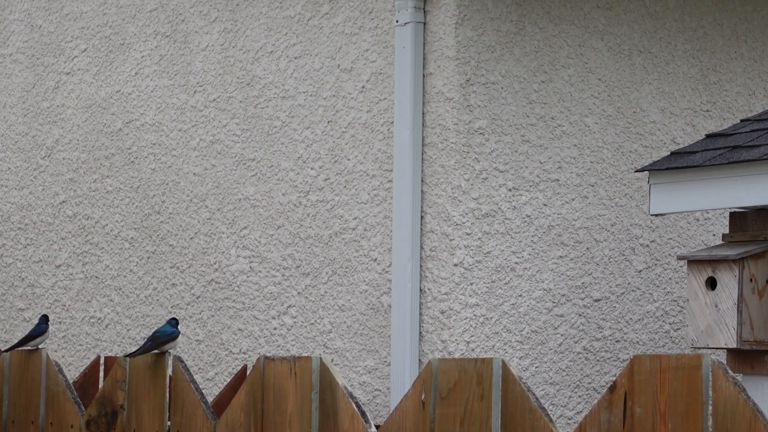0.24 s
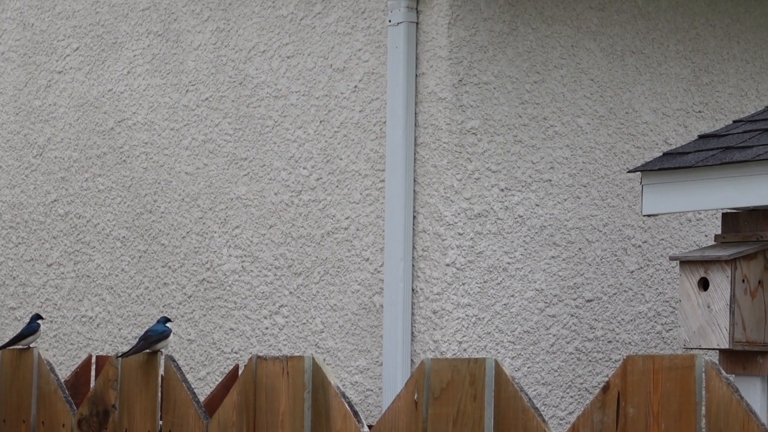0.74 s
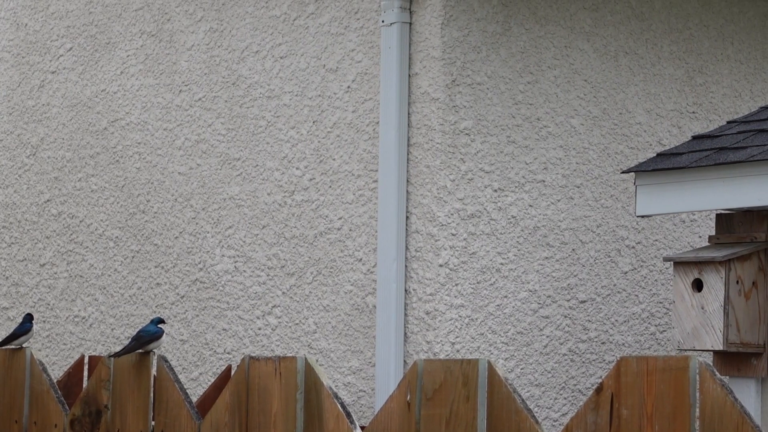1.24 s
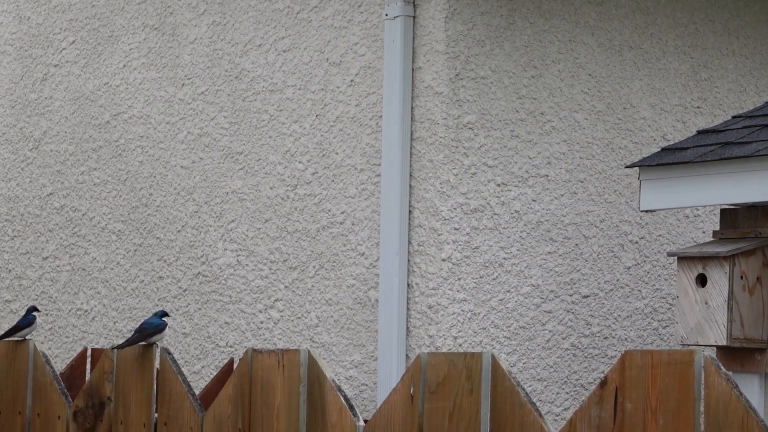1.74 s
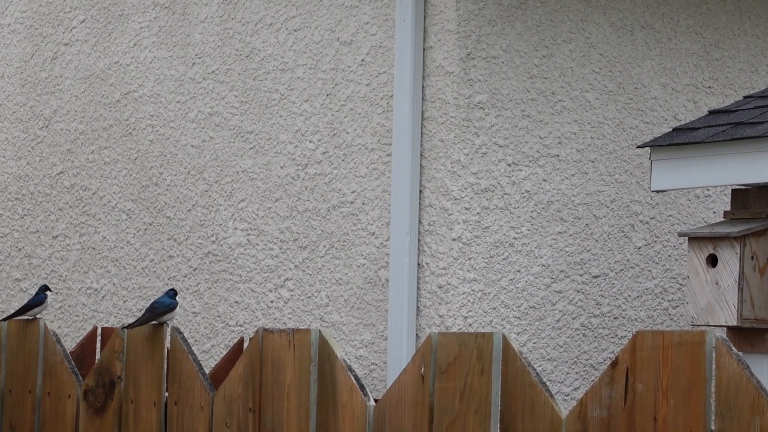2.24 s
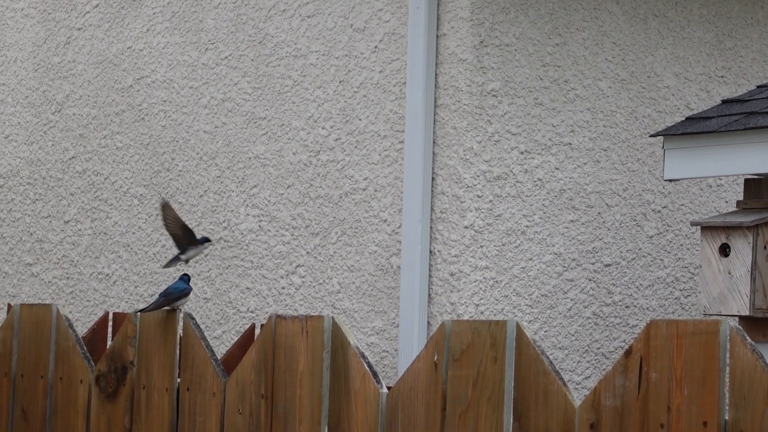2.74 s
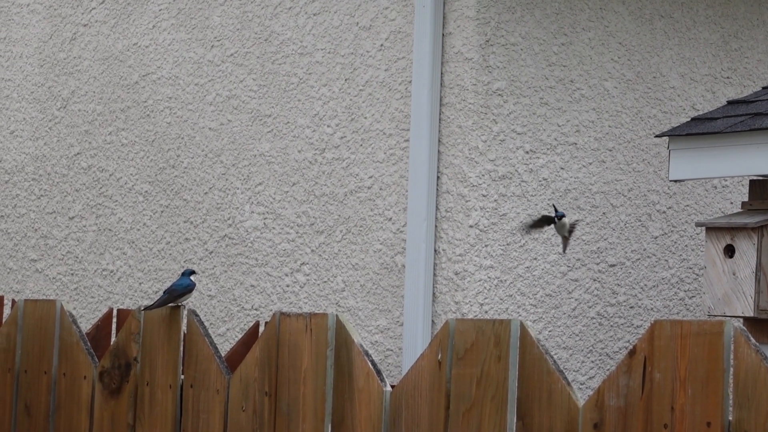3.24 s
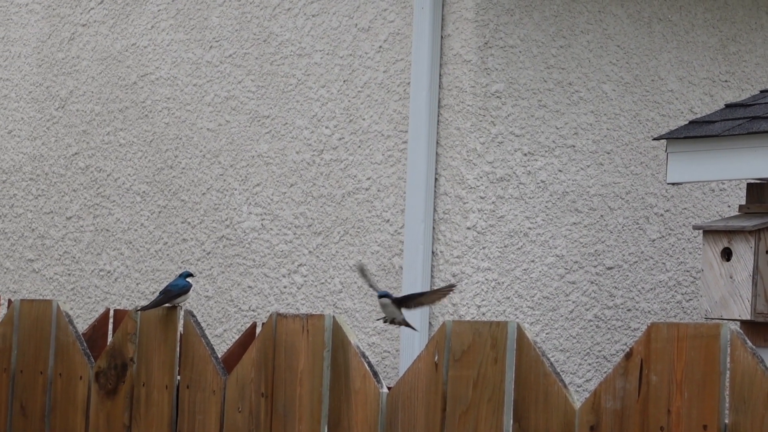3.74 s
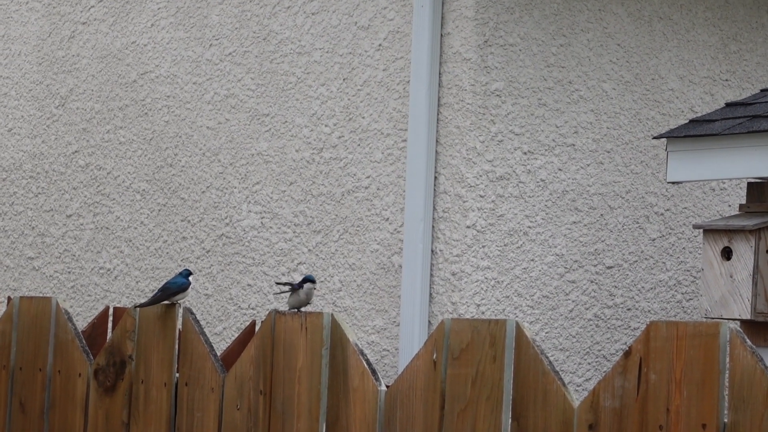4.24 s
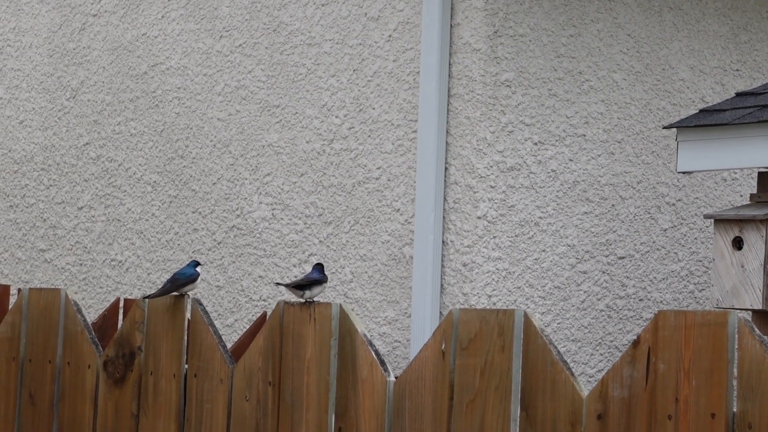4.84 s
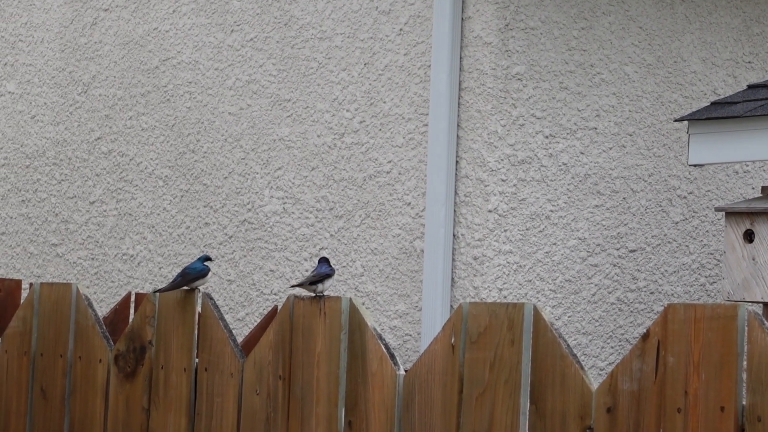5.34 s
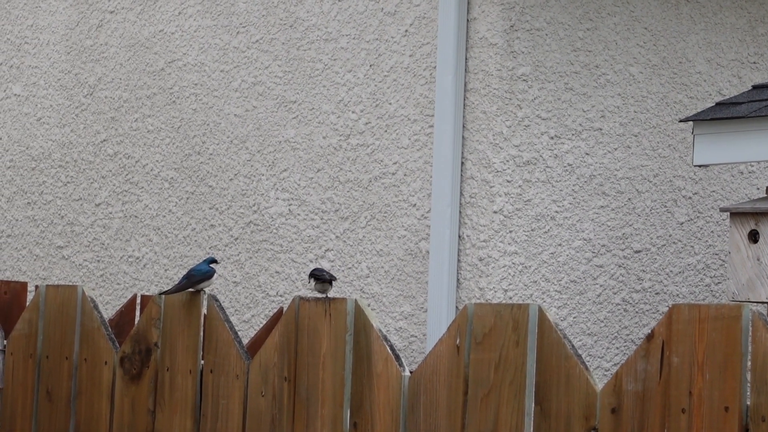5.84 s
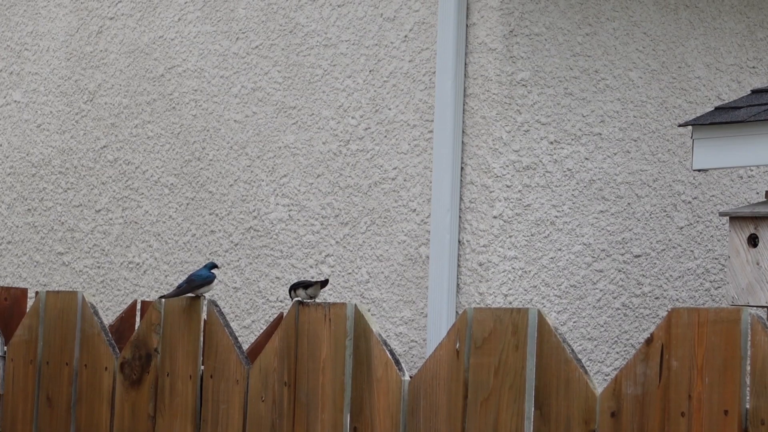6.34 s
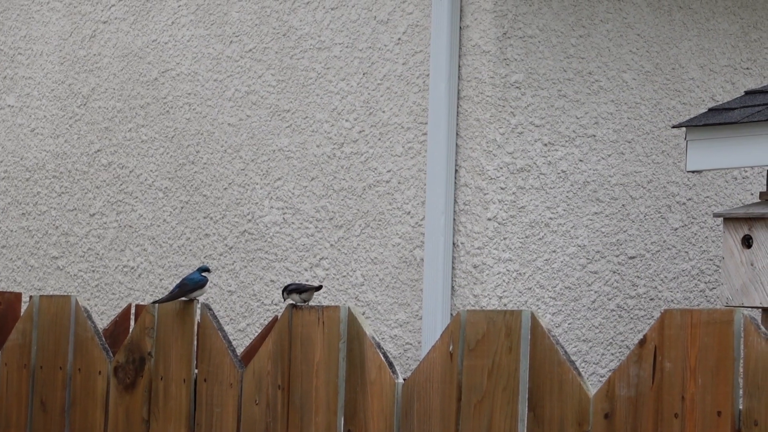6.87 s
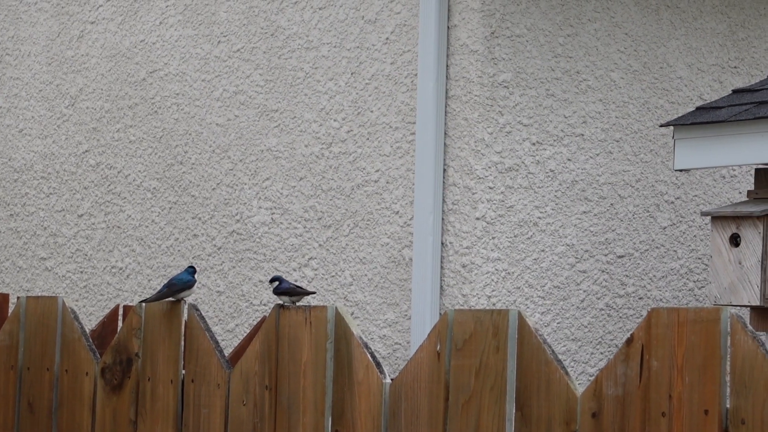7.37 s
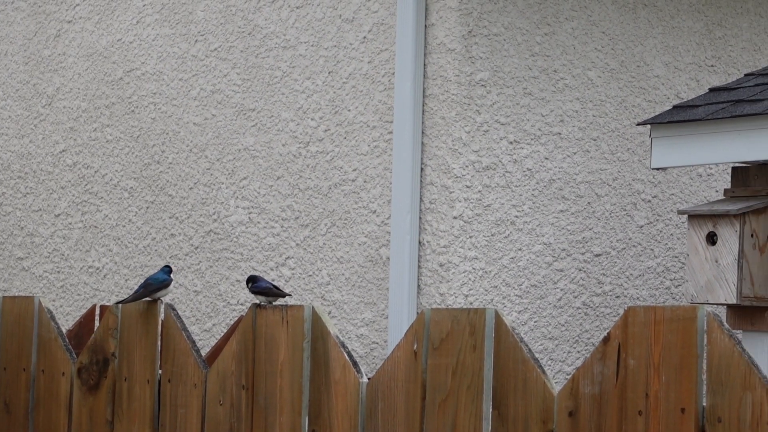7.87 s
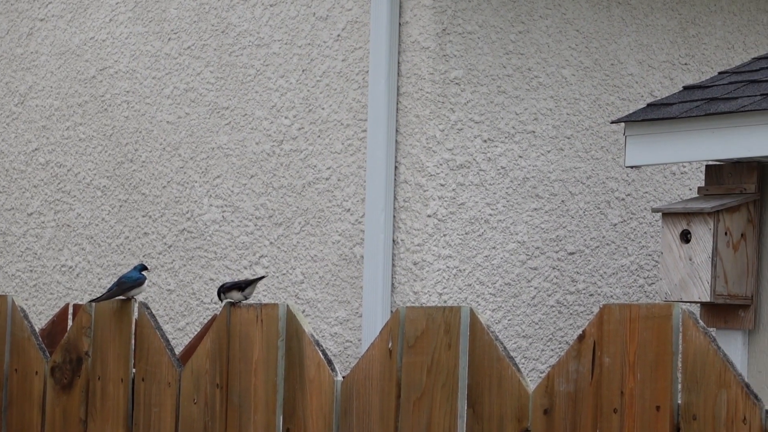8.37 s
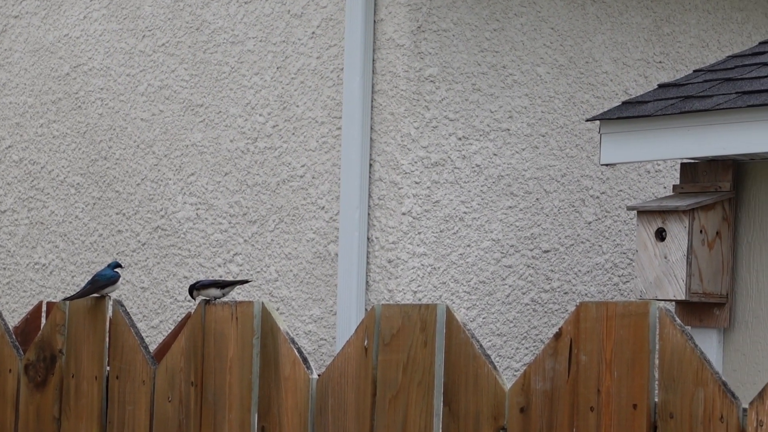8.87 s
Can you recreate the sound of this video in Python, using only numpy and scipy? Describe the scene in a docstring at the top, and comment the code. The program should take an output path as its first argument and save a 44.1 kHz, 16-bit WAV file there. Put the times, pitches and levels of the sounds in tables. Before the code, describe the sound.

Two small birds chatter outdoors, from sparse ticks to bright falling runs and a harsh rasp, before a distant trill and returning chips.

```python
"""Quiet town air, a wavering low hum and far whistles lie behind swallows calling on a yard fence by a wall.
Short chips come first, then warbles, harsh rasps, lone falling notes, runs of four and arched whistles.
Near the end a far bird trills and the chips return. Calls are gliding tones with overtones; rasps add
throbbing noise. The wall throws each call back at once and the yard's scattered echoes die away within
half a second."""
import sys
import numpy as np
from scipy import signal
from scipy.fft import rfft, irfft
from scipy.io import wavfile
from scipy.ndimage import uniform_filter1d

SR = 44100
rng = np.random.default_rng(int(sys.argv[2]) if len(sys.argv) > 2 else 0)


def wav_out(sig):
    """Save sig, one row per channel (or a flat mono array), as 16-bit PCM at SR to the path in sys.argv[1]."""
    wavfile.write(sys.argv[1], SR, np.round(np.clip(np.atleast_2d(sig).T, -1, 1) * 32767).astype(np.int16))


N = 401751  # samples


def amp(db):
    """Decibels to amplitude."""
    return 10 ** (np.asarray(db) / 20)


def evened(x):
    """Brings a signal to an rms of 1."""
    return x / np.sqrt(np.mean(x ** 2) + 1e-20)


def wobble(count, span):
    """Smooth chance of rms 1 that changes over about span samples."""
    smooth = uniform_filter1d(rng.standard_normal(count), span)
    return evened(uniform_filter1d(smooth, span))


def read(points, hz):
    """Reads a curve of (Hz, value) points along a logarithmic frequency axis."""
    point_hz, value = np.transpose(points)
    return np.interp(np.log(hz + 1), np.log(point_hz + 1), value)


def follow(points, t):
    """Reads a curve of (seconds, value) points at the times t."""
    return np.interp(t, *np.transpose(points))


def add(mix, s, sound):
    """Lays a sound into the mix at s seconds, cut off at the end of the mix."""
    part = mix[round(s * SR):][:len(sound)]
    part += sound[:len(part)]


def steps(length):
    """Runs from 0 to 1 over a length in seconds."""
    return np.linspace(0, 1, round(length * SR))


def swell(u, rise, fall):
    """Soft start and end over the given shares of a sound."""
    edge = np.minimum(u / rise, (1 - u) / fall)
    return np.sin(np.pi / 2 * np.clip(edge, 0, 1)) ** 2


def sing(hz, partials_db, unsteady=.5):
    """A tone on the pitch curve hz; its overtones flicker and take the colour of the beak."""
    # What the beak passes of overtones. Each row: frequency in Hz, gain in dB.
    beak = [(6500, 3), (8000, 0.5), (10000, -15.5), (12600, 8.5), (14200, -23)]
    turn = 2 * np.pi * (np.cumsum(hz) / SR + rng.random())
    hiss = np.diff(rng.standard_normal(len(hz) + 1))  # air hissing past the voice
    tone = amp(partials_db[0]) * np.sin(turn) + amp(-47) * hiss
    for partial, db in enumerate(partials_db[1:], start=2):
        flicker = 1 + unsteady * wobble(len(hz), 12)
        level = amp(db + read(beak, partial * hz))
        tone = tone + level * flicker * np.sin(partial * turn)
    return tone


def far_birds():
    """Faint wavering glides, low blips, and a trill of V-shaped notes."""
    # Far whistles. Each row: start in seconds, length in seconds, start pitch in Hz, end pitch in Hz, level in dB.
    far_whistles = [(0, 0.037, 2740, 2700, -50), (0.221, 0.046, 3070, 2930, -58),
                    (0.511, 0.54, 2674, 2822, -67), (0.68, 0.095, 4120, 3760, -64),
                    (1.56, 0.13, 3940, 3940, -62.5), (3.095, .022, 5250, 5750, -41),
                    (6.978, 0.06, 4270, 5560, -56), (7.084, 0.043, 6840, 4300, -60),
                    (7.11, 0.13, 3290, 3350, -61), (7.158, 0.07, 4390, 5500, -57),
                    (7.993, 0.045, 2800, 2320, -64), (8.03, 0.22, 2320, 2340, -66),
                    (8.25, .07, 2540, 2680, -67) , (8.138, 0.084, 2920, 2900, -67),
                    (8.521, 0.071, 3040, 3030, -63), (8.531, 0.052, 4560, 5100, -51.5)]
    # Faint low blips. Each row: start in seconds, length in seconds, pitch in Hz, level in dB.
    blips = [(1.285, .025, 390, -56), (7.808, .02, 570, -55)]
    # The growing level of the trill. Each row: time in seconds, level in dB.
    trill_level = [(7.8, -56.5), (8.3, -49), (9.1, -44)]
    out = np.zeros(N)
    for s, length, start_hz, end_hz, db in far_whistles:
        u = steps(length)
        hz = start_hz + (end_hz - start_hz) * u + 55 * wobble(len(u), 250)
        level = amp(db + 1.6 * wobble(len(u), 500))
        add(out, s, level * sing(hz, [0]) * swell(u, 0.15, 0.076))
    for s, length, hz, db in blips:
        u = steps(length)
        add(out, s, amp(db) * np.sin(2 * np.pi * hz * length * u) * swell(u, 0.15, 0.26))
    u = steps(.019)
    v_hz = np.interp(u, [0, .6, .75, 1], [5900, 3950, 4050, 6500])
    k = np.arange(30)
    trill_s, gap_s, hurry_s = 7.791, .0462, 3.7e-5
    # the trill speeds up a little: each gap is twice hurry_s shorter than the one before
    for s in trill_s + (gap_s - hurry_s * k) * k:
        add(out, s, amp(follow(trill_level, s)) * sing(v_hz, [0]) * swell(u, .3, .2))
    return out


def hum():
    """A low machine tone with a weak octave, a little unsteady in pitch and level."""
    # The slow drift of the hum's pitch. Each row: time in seconds, pitch in Hz.
    pitch = [(0, 142.1), (9.11, 138)]
    # The rise and fall of the hum. Each row: time in seconds, rms level in dB before the wavering.
    loudness = [(0, -66.5), (1.8, -52), (3.2, -46.5), (4.1, -57), (5, -59), (6.2, -54), (7.9, -51.5),
                (8.9, -60)]
    t = np.arange(N) / SR
    hz = follow(pitch, t) + 1.46 * wobble(N, 2500)
    turn = 2 * np.pi * np.cumsum(hz) / SR
    level = np.sqrt(2) * amp(follow(loudness, t) + 0.32 * wobble(N, 2500))
    return level * (np.sin(turn) + amp(-30.5) * np.sin(2 * turn))


def air():
    """Town air on two sides: random short-time spectra with faint drifting patches."""
    # The colour of the air. Each row: frequency in Hz, relative level in dB per Hz.
    colour = [(20, -46), (60, -30.5), (110, -4), (200, -9), (480, -20), (1350, -23), (2300, -26),
              (3500, -29.5), (15700, -44.5)]
    # How alike left and right are. Each row: frequency in Hz, likeness from 0 to 1.
    likeness = [(25, 0.69), (90, .95), (300, 0.71), (1500, 0.54), (8000, 0.67)]
    frames, hz = N // 512 + 5, np.fft.rfftfreq(2048, 1 / SR)
    a, b, c, d, patches = rng.standard_normal((frames, 1025, 5)).T
    patches = uniform_filter1d(patches, 20, 0)  # across frequency
    patches = evened(uniform_filter1d(patches, 12, 1))  # across time
    same = np.clip(read(likeness, hz), -1, 1)[:, None]
    left, other = a + 1j * b, c + 1j * d
    right = same * left + np.sqrt(1 - same ** 2) * other
    spectra = np.array([left, right]) * amp(read(colour, hz)[:, None] + 0.5 * patches)
    sound = signal.istft(spectra, nperseg=2048, noverlap=1536)[1][:, :N]
    return amp(-54.5) * evened(sound)


def chip(db, hz, third_db):
    """A few milliseconds of a low, rich tone with a strong second partial and a noisy snap."""
    u = steps(0.0035)
    partials_db = [-3, 3, third_db, third_db - 22, -28, -32]
    tone = sing(hz * (1 + 0.093 * (u - .5)), partials_db, unsteady=.22)
    snap = amp(third_db - 20) * rng.standard_normal(len(u))
    return amp(db - 5) * (tone + snap) * swell(u, 0.24, 0.077)


def warble(climb, db, opening_db, start_hz, hump_hz, dip_hz, dip, top_hz):
    """Fast vibrato over a hump that sags, a jump to the top, then a clean slide down."""
    # The opening. Each row: share of the climb's time, level in dB, vibrato depth as a share of pitch.
    opening = [(0, -5, 0.054), (.12, -6, 0.049), (.33, 0, 0.078), (.7, -2.5, .07)]
    slide_s, slide_bend, slide_end_hz = .023, .82, 3300
    t = np.arange(round((climb + slide_s) * SR)) / SR
    share, level_db, depth = np.transpose(opening)
    at = np.append(share * climb, climb)
    slide = np.clip((t - climb) / slide_s, 0, 1)
    # the hump comes early; the jump from the dip lands just under the top
    turning_points = [0, .15, dip, dip + .14, 1]
    hz = np.interp(t / climb, turning_points, [start_hz, hump_hz, dip_hz, .94 * top_hz, top_hz])
    hz = hz - (top_hz - slide_end_hz) * np.sin(np.pi / 2 * slide) ** slide_bend
    hz = uniform_filter1d(hz, size=150)
    vibrato_turns = 225 * t + 0.071 * wobble(len(t), 200) + rng.random()
    shake = np.interp(t, at, np.append(depth, .02)) * (1 - slide) ** 8
    shake = shake * np.sin(2 * np.pi * vibrato_turns)
    level = amp(db + np.interp(t, at, np.append(level_db + opening_db, 0)) - 14.5 * slide)
    throb = 1 + 6 * shake  # louder at the top of each shake
    return level * throb * sing(hz * (1 + shake), [0, -21, -42]) * swell(t / t[-1], .06, .05)


def rasp(rows):
    """Chaotic voicing: throbbing broad noise around a wavering tone that can clear up."""
    # The colour of the noise. Each row: frequency in Hz, relative level in dB per Hz.
    noise_colour = [(900, -27), (1500, -17.5), (3600, 0.5), (6000, 3), (9200, -21), (15000, -28.5)]
    s, level_db, hz, clear = np.transpose(rows)
    t = np.arange(s[0], s[-1], 1 / SR)
    clear = np.clip(np.interp(t, s, clear), 0, 1)
    noise = rng.standard_normal(len(t))
    colour = amp(read(noise_colour, np.fft.rfftfreq(len(t), 1 / SR)))
    broad = irfft(rfft(noise) * colour, len(t))
    wavering_hz = np.interp(t, s, hz) * (1 + 0.081 * (1 - clear) * wobble(len(t), 70))
    tone = sing(wavering_hz, [34 * clear ** 2 - 19, 2, -18, -22])
    throb = amp(1.22 * (2.0 - clear ** 2) * wobble(len(t), 90))
    voice = throb * ((1 - clear) * evened(broad) + clear * evened(tone))
    return amp(np.interp(t, s, level_db)) * voice * signal.windows.tukey(len(t), .1)


def note(db, start_hz, end_hz, length, hook_hz, bend):
    """Hooks up to its pitch and then drops ever faster, fading as it falls."""
    u = steps(length)
    hook = hook_hz * np.exp(-u / .16)
    hz = start_hz - hook + (end_hz - start_hz) * u ** bend
    return amp(db - 12 * u ** 2) * sing(hz, [0, -35, -41]) * swell(u, .18, .2)


def run_of_notes(db, lead_db, lead_hz, second_hz, lift_hz, spacing):
    """A high lead, a loud held note, then two steeper slides, each lower."""
    # The four notes. Each row: delay in spacings, level in dB, start pitch in Hz before the run's own
    # pitch or lift is added, end pitch in Hz, length in seconds.
    four_notes = [(0, 4, 30, 4200, .0085), (0.989, 4.5, 8.6, 3100, .0098), (2.051, 2.5, 5500, 2740, .0085),
                  (2.95, 2, 4560, 2513, .009)]
    # Their shapes. Each row: upward hook at the start in Hz, bend of the fall (1 is straight).
    shapes = [(700, 2.8), (400, 2.7), (250, 1.5), (200, 1.3)]
    out = np.zeros(SR // 10)
    own = [(lead_db, lead_hz), (0, second_hz), (0, lift_hz), (0, lift_hz)]
    for row, shape, (own_db, own_hz) in zip(four_notes, shapes, own):
        delay, step_db, hz, end_hz, length = row
        sound = note(db + step_db + own_db, hz + own_hz, end_hz, length, *shape)
        add(out, delay * spacing, sound)
    return out


def arch(length, top_hz, db):
    """A whistle that climbs quickly, holds, and dips at the end."""
    u = steps(length)
    climb = .54 * np.exp(-u * length / .0051)  # share of pitch, over a time in s
    dip = .37 * np.exp((u - 1) * length / .00234)
    hz = top_hz * (1 - climb - dip)
    return amp(db) * sing(hz, [0, -33, -29]) * swell(u, .35, .15)


def swallows():
    """All near calls, dry, each placed at its time."""
    # Each row: start in seconds, level in dB, pitch in Hz, third partial in dB before the beak's colour.
    chips = [(0.055, -33.5, 1892, 4), (0.2912, -36.5, 2630, -14), (1.0907, -38.5, 2340, -12),
             (1.2407, -36, 2140, -8), (1.363, -33.5, 2330, -9), (1.497, -35, 2087, -1.5),
             (2.266, -35.5, 1970, -7), (2.36, -35.5, 2230, -9), (2.4776, -35, 2100, -0.5),
             (2.985, -29, 2395, -8), (3.123, -33, 2550, -12), (3.5805, -27, 2730, -14),
             (8.342, -33.5, 1970, 4.5), (8.441, -32.5, 1980, 3.5), (8.5814, -35.5, 2680, -8),
             (8.717, -29, 2387, -5.5), (8.882, -27, 2330, -7), (9.0218, -32, 2350, -8.5)]
    # Each row: start in seconds, time to the pitch top in seconds, level in dB, opening level in dB added
    # to it, start pitch in Hz, early hump in Hz, dip in Hz, dip as share of the time, top in Hz.
    warbles = [(2.102, .073, -23.5, -4, 3200, 4700, 3900, .73, 5250),
               (2.780, .075, -17.5, -1, 3800, 4750, 3750, .7, 5200),
               (3.056, .076, -14.5, -7, 3100, 4600, 3950, .75, 5250),
               (3.543, .071, -16, -3, 3500, 4900, 3800, .7, 5200),
               (3.908, .07, -13.5, -5, 3400, 4700, 3800, .62, 5350),
               (5.083, .071, -16.5, -6, 4300, 5100, 4000, .6, 5150),
               (5.953, .068, -25, 1, 4500, 4500, 3800, .72, 4820),
               (7.433, .069, -17.5, -6, 4400, 4850, 4200, .64, 5200)]
    # One table a rasp. Each row: time in seconds, level in dB, voice pitch in Hz, clear share from 0 to 1.
    rasps = [
        [(2.62, -54, 2700, 0.95), (2.665, -37.5, 2585, 0.02), (2.695, -25.5, 2000, 0.32),
         (2.745, -44, 2067, 0.63)],
        [(3.224, -39.5, 2670, 0.3), (3.262, -26, 2837, 0.47), (3.31, -21.5, 2970, 0.57),
         (3.33, -25.5, 3010, 0.6)],
        [(3.345, -39.5, 2894, 0.06), (3.380, -18, 2800, 0.66), (3.388, -24, 3900, .85), (3.392, -28, 3350, .85),
         (3.395, -27.5, 4250, 0.95), (3.409, -29, 3150, 0.92) ],
        [(4.518, -37, 2056, 0.42), (4.53, -27.5, 1920, 0.39)],
    ]
    # Lone sliding notes. Each row: start in seconds, level in dB, start pitch in Hz, end pitch in Hz,
    # length in seconds.
    lone_notes = [(3.7476, -16.5, 5460, 3110, 0.0076), (3.755, -14.5, 5080, 2920, 0.0077),
                  (4.187, -40, 4760, 3790, 0.012), (4.675, -45, 4430, 3800, 0.0084),
                  (5.0702, -25, 4930, 3550, 0.013), (5.9875, -18, 5500, 3900, 0.011),
                  (6.578, -36, 4250, 3380, 0.0064), (6.777, -40, 2460, 1860, .009),
                  (7.208, -31, 4650, 3100, 0.008), (7.2144, -24, 5540, 2920, 0.02),
                  (7.231, -24, 4400, 3180, 0.0096), (7.241, -40, 2570, 3030, 0.016),
                  (7.256, -23.5, 4000, 2900, 0.0105), (7.265, -22.5, 5350, 3610, 0.022),
                  (7.283, -21, 4290, 2670, 0.012), (7.296, -27, 5610, 3670, 0.011)]
    # The shape of a lone note: upward hook at the start in Hz, bend of the fall (1 is straight).
    lone_shape = (49, 1.36)
    # Runs of four falling notes. Each row: start in seconds, level in dB, lead note's level in dB added to it,
    # lead pitch in Hz, second pitch in Hz, lift of the last two in Hz, spacing in seconds.
    runs = [(3.862, -21.5, -10, 6160, 5340, 102, 0.0096), (3.931, -22.5, -4, 6000, 5420, 506, 0.0074),
            (4.1973, -22.5, -10, 6120, 5380, 88, 0.01), (4.264, -19.5, -6.5, 6260, 5320, 400, 0.0082),
            (4.685, -26, -10, 6020, 5420, 200, 0.011), (4.751, -22, -6, 5970, 5260, 503, 0.0091),
            (4.824, -23, -10.5, 6184, 4950, 443, 0.0081), (5.090, -21, -8, 6010, 5280, 101, 0.01),
            (5.155, -20, -10, 6200, 5100, 529, 0.0084), (5.429, -22.5, -13, 6240, 5290, 0, 0.0088),
            (5.503, -22.5, -8, 6520, 5470, 698, 0.009), (5.585, -24, -15, 5340, 4800, 487, .0088),
            (6.065, -19.5, -4, 5570, 4970, -100, .0097), (6.135, -17.5, -2.5, 5560, 5090, 594, 0.0089),
            (6.286, -17.5, -6, 5590, 5270, -350, 0.0099), (6.360, -18, -8, 6380, 5190, 534, 0.0087),
            (6.586, -18.5, -6, 5740, 5300, -100, 0.0089), (6.659, -19.5, -7, 6480, 5350, 547, 0.0092),
            (6.741, -22.5, -8.5, 5726, 4980, 534, 0.0081)]
    # Arched whistles between the runs. Each row: start in seconds, length in seconds, top in Hz, level in dB.
    arches = [(3.899, 0.032, 4350, -26), (4.236, 0.029, 4495, -22.5), (4.726, 0.028, 4310, -27.5),
              (4.803, 0.025, 3996, -28.5), (5.463, 0.041, 4315, -25), (6.117, 0.019, 4360, -22.5),
              (6.274, 0.015, 4630, -30), (6.323, 0.04, 4280, -24), (6.633, 0.024, 4290, -24),
              (6.714, 0.027, 4050, -32.5)]
    out = np.zeros(N)
    for call, table in [(chip, chips), (warble, warbles), (run_of_notes, runs), (arch, arches)]:
        for s, *row in table:
            add(out, s, call(*row))
    for rows in rasps:
        add(out, rows[0][0], rasp(rows))
    for s, *row in lone_notes:
        add(out, s, note(*row, *lone_shape))
    return out


def yard(x):
    """Two wall echoes, and sparse taps of random sign that die away fast and then slowly."""
    at = np.arange(200, SR // 2, 20)
    t = at / SR
    fast = amp(-5 - 60 * t / .06)
    slow = amp(-30 - 60 * t / .5)
    fade = (fast + slow) * np.minimum(t / .023, 1)  # the scattered echoes take 23 ms to build up
    taps = np.zeros((2, SR // 2 + 20))
    signs = rng.choice([-1., 1.], (3, len(at)))
    place = at + rng.integers(0, 20, len(at))
    taps[:, place] = fade * (signs[0] + 0.42 * signs[1:])  # partly shared by both sides
    taps[:, round(.0082 * SR)] = amp([-8, -9])  # wall echoes, left and right
    taps[:, round(.0165 * SR)] = amp([-16, -15])
    rough_walls = signal.butter(1, 7500, fs=SR, output="sos")  # they swallow treble
    taps = signal.sosfilt(rough_walls, taps)
    return signal.fftconvolve(x[None], taps, axes=1)[:, :N]


def scene():
    """Calls and their echoes over hum and air, the right side a little louder."""
    far, near = far_birds(), swallows()
    echoes = yard(near + 0.92 * far)
    return (near + far + echoes + hum()) * amp([[-.5], [.5]]) + air() * amp([[-.3], [.3]])


def record(dry):
    """The band limit: a steep low-pass takes away what lies above 15.8 kHz."""
    low_pass = signal.firwin(511, 15800, window=("kaiser", 9), fs=SR)
    return signal.oaconvolve(dry, low_pass[None], "same")


dry = scene()
out = record(dry)
wav_out(out)
```